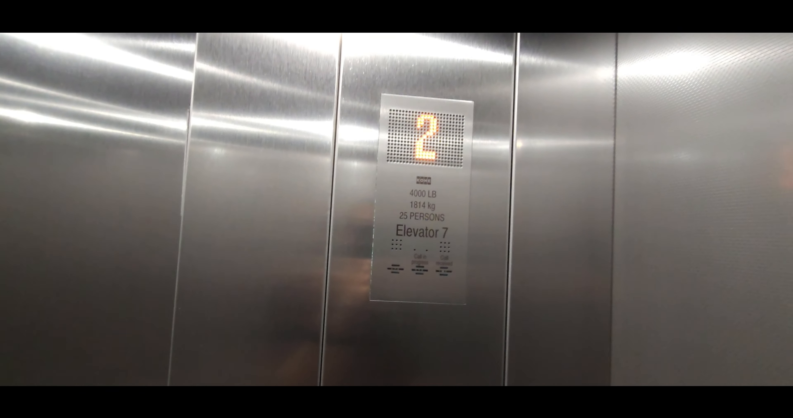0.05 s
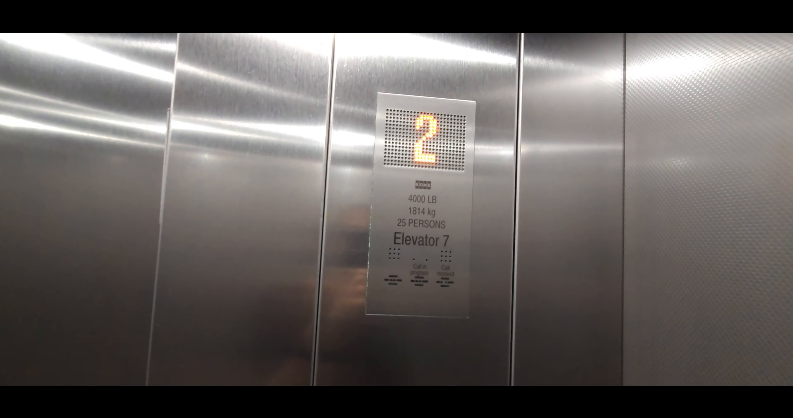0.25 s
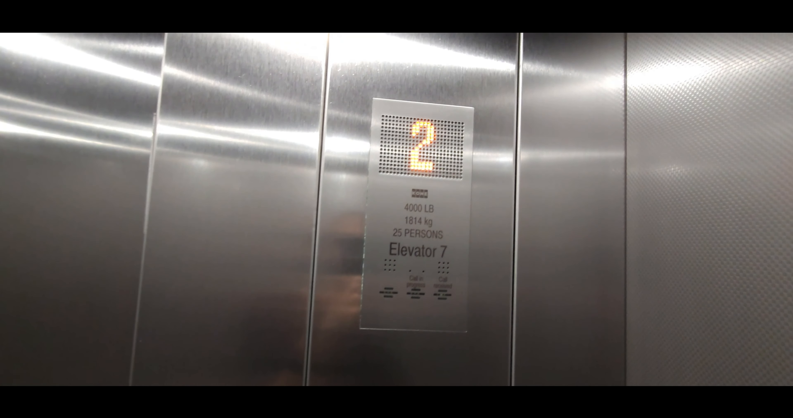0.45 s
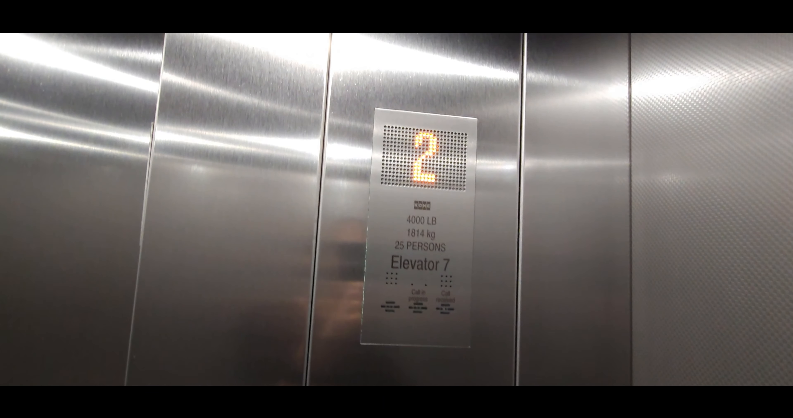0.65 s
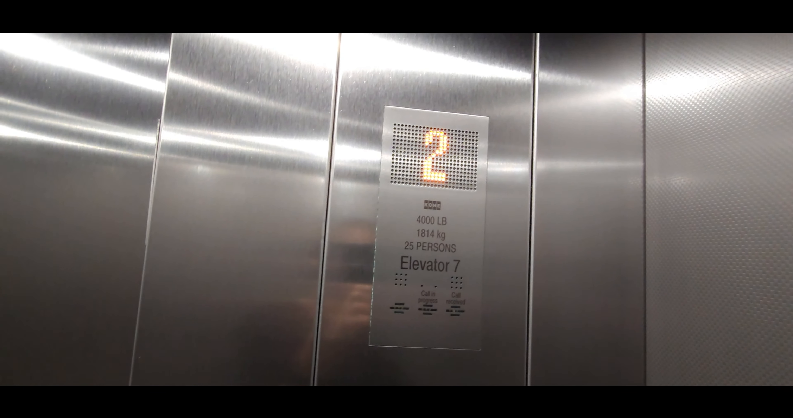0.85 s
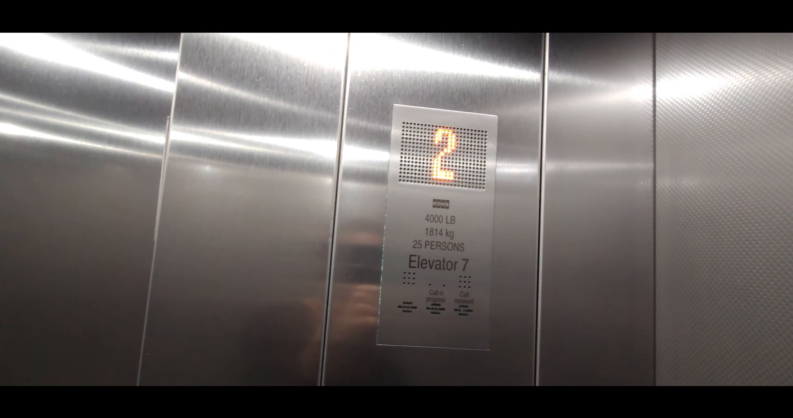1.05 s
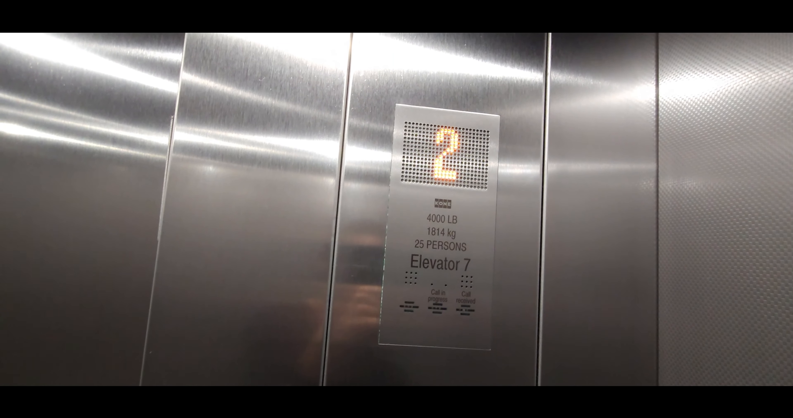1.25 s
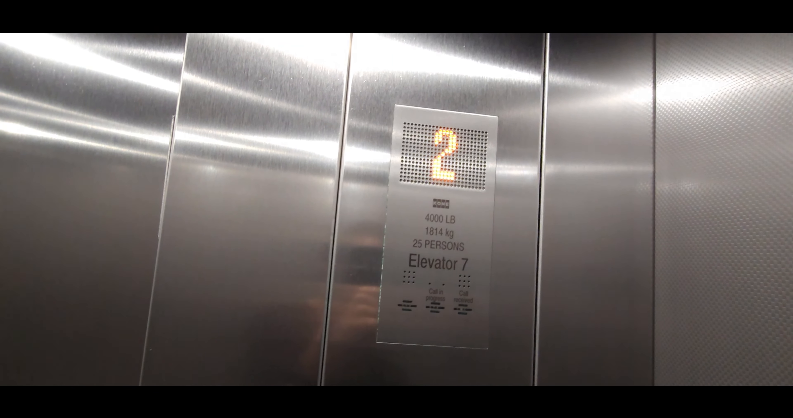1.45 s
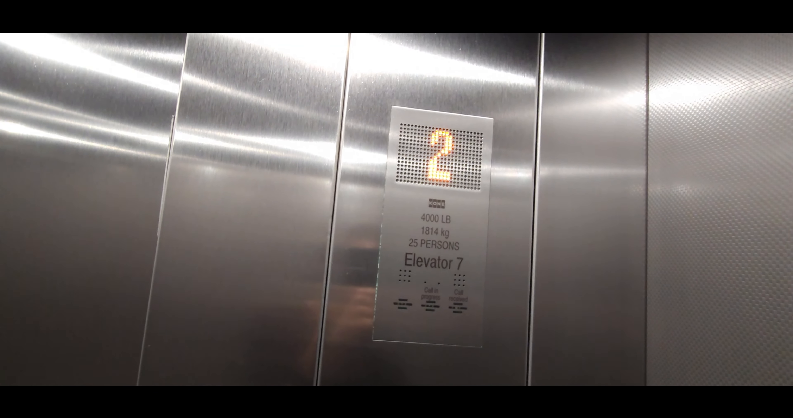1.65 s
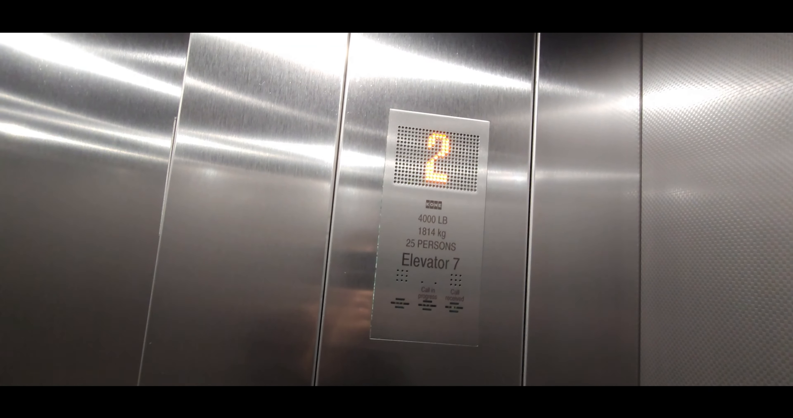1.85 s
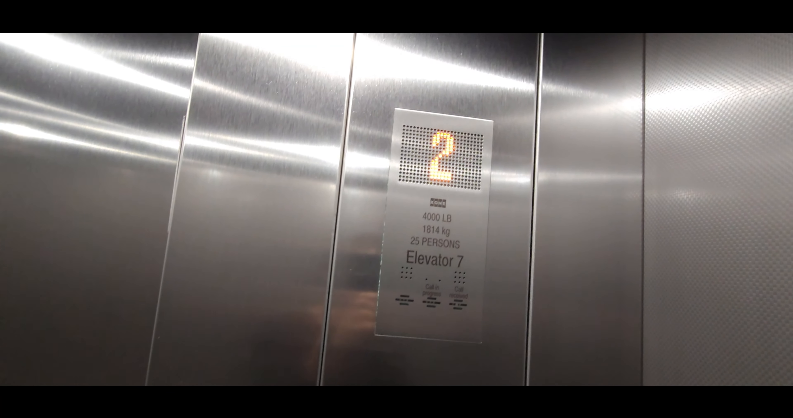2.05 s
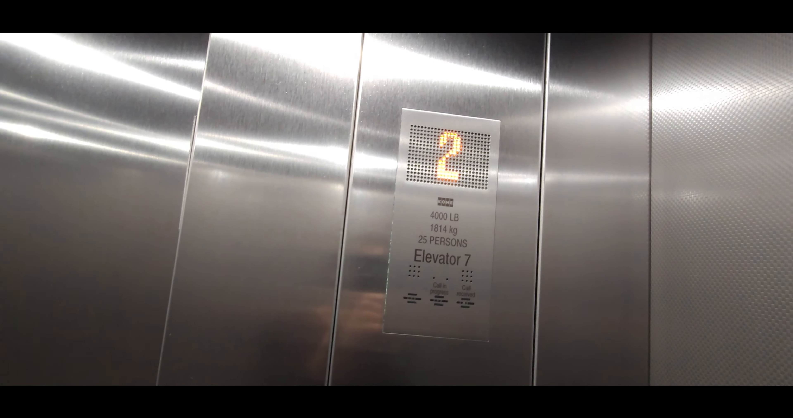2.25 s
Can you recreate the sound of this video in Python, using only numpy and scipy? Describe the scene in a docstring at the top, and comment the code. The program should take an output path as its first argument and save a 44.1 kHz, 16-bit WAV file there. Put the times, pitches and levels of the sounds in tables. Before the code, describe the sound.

An elevator ride from inside: deep hum and rumble swell while the steel car thumps and rattles

```python
"""Inside a steel hydraulic elevator car going up: tuned hum from the pump motor and noise rumble from the car,
both growing. A soft noise hiss stops early on, and dull thumps (pushes into a low resonance) recur throughout.
Then come panel knocks and small ticks (ringing noise bursts) and a brief scuff on the steel.
From about one second the car shudders in short swells of boom, rattle and buzz, with one sharp tick as they begin.
Near the end two snaps mark the loudest shudder overloading the microphone."""
import sys
import numpy as np
from scipy.fft import rfft, irfft, next_fast_len
from scipy.io import wavfile
from scipy.ndimage import uniform_filter1d, map_coordinates

SR = 44100
rng = np.random.default_rng(int(sys.argv[2]) if len(sys.argv) > 2 else 0)


def wav_record(signal):
    """Record a signal, one row per channel, as 16-bit PCM in the file named by sys.argv[1]."""
    frames = np.transpose(np.atleast_2d(signal))
    bounded = np.clip(frames, -1, 1)
    # unit amplitude maps onto the largest positive 16-bit level
    quanta = np.round(bounded * 32767).astype(np.int16)
    wavfile.write(sys.argv[1], SR, quanta)


N = 101562

# Every noise colour below has rows of: frequency in Hz, relative density in dB per Hz.

# Motor hum lines. Each row: frequency in Hz, level in dB before the hum fader.
HUM_LINES = [(121, -0.5), (253.7, 2), (505, -16.5), (560, -12.5), (673, -16), (762, -13), (1690, -44),
             (1976, -42)]
# Fader of the motor hum. Each row: time in seconds, gain in dB.
HUM_FADER = [(0, -51.5), (.8, -50.5), (1.15, -42.5), (1.65, -39), (1.95, -32), (2.3, -26.5)]
HUM_WAVER_DB, LOWEST_LINE_DRIFT_HZ = 2.5, 1.2

# Fader of the rumble and its air. Each row: time in seconds, gain in dB.
RIDE_FADER = [(0, -48.5), (0.468, -48), (0.821, -47), (1.102, -43.5), (1.3, -43), (1.63, -37.5),
              (1.95, -34.5), (2.3, -34.5)]
# Noise colour of the car's rumble.
RUMBLE_COLOUR = [(15, -13), (35, -0.5), (80, 3), (170, 1), (280, -8.5), (340, -13), (500, -9), (780, -14),
                 (950, -25), (1300, -44), (2500, -55), (4000, -64)]
# Resonances of the car and its walls. Each row: centre in Hz, width in Hz, lift in dB.
CAB_RESONANCES = [(124, 23, 4), (163, 18, -2.5), (247.4, 20, 11.5), (458.7, 41, 5.5), (507.3, 33, 8.5),
                  (557.4, 25, 6), (761, 100, 4), (1722, 150, 5), (1944, 56, 6.5)]
# Noise colour of the airy hiss of the ride.
AIR_COLOUR = [(1000, -18), (2500, 0), (3300, 2.5), (5500, 2), (6700, -3.5), (7300, -18), (12000, -28.5),
              (15500, -19)]
RUMBLE_DB, AIR_DB = 9, -22.5  # both before the ride fader

# Noise colour of the bright part of the early hiss.
BRIGHT_HISS_COLOUR = [(200, -11), (700, -23.5), (1200, 0.5), (2000, 2), (2700, -2.5), (3100, -2),
                      (3700, -6.5), (4100, -26.5), (6000, -30.5), (7000, -49)]
# Noise colour of the duller part, which lasts a little longer.
DULL_HISS_COLOUR = [(200, -12), (750, 3.5), (1300, -2.5), (1550, -21.5), (1800, -47.5)]
# Each part fades to silence at its end, over its release.
BRIGHT_DB, BRIGHT_SAG_DB_PER_S, BRIGHT_END_S, BRIGHT_RELEASE_S = -49.5, 11.5, 0.355, 0.0073
DULL_DB, DULL_END_S, DULL_RELEASE_S = -51, 0.44, 0.026

# Pushes behind the dull thumps. Each row: centre in seconds, push peak in dB, length in seconds.
THUMP_PUSHES = [(.036, -11, 0.0019), (.2135, 1, 0.0016), (0.286, -13, 0.0021), (1.084, -12, 0.0018),
                (1.335, -12, .0022), (1.729, -15, 0.0023), (1.78, 3, 0.0021), (2.021, 0, 0.0028),
                (2.203, -2, 0.0014)]
THUMP_HZ, THUMP_Q, THUMP_LOW_CUT_HZ = 58.4, 2.06, 26

# Panel knocks. Each row: start in seconds, level in dB, time to fall 60 dB in seconds.
PANEL_KNOCKS = [(.616, -30.5, 0.16), (.64, -21.5, 0.11), (.69, -29.5, 0.29), (.762, -27, 0.12),
                (1.426, -27.5, 0.073), (1.756, -21.5, 0.079), (1.857, -17.5, 0.17), (2.085, -30.5, .05),
                (2.152, -39.5, 0.091)]
# Noise colour of a knocked panel.
PANEL_COLOUR = [(150, -12), (350, -5.5), (470, 1), (620, 0.5), (800, -4.5), (1100, -21), (1600, -43),
                (2400, -48), (3200, -40.5), (4200, -63.5), (8000, -77)]
# Sharp metal ticks. Each row: start in seconds, level in dB, time to fall 60 dB in seconds.
METAL_TICKS = [(.618, -53, 0.14), (.957, -36, 0.14), (1.801, -43.5, 0.04)]
# Noise colour of the ticking metal.
METAL_COLOUR = [(1200, -49.5), (1800, -24), (2150, -9), (2500, -1), (3300, -1.5), (3900, -18.5),
                (6200, -25.5), (7200, -60)]
ATTACK_S = 0.0016

# Noise colour of the scuff.
SCUFF_COLOUR = [(150, -5), (400, -9), (750, -1), (1200, -4), (2000, -22), (2600, -30), (4000, -50)]
SCUFF_CENTRE_S, SCUFF_LENGTH_S, SCUFF_DB = 0.68, 0.06, -42.5

# Shudders. Each row: peak time in seconds, boom in dB, rattle in dB, rise in seconds, fall in seconds.
# Rise and fall are the times for 20 dB.
SHUDDER_SWELLS = [(.97, -29, -49, 0.093, 0.053), (1.343, -17, -30.5, 0.031, 0.075),
                  (1.437, -12, -28, 0.052, 0.058), (1.527, -20, -30.5, 0.025, 0.041),
                  (1.729, -14.5, -29, 0.028, 0.047), (1.787, -12, -20.5, 0.033, 0.041),
                  (1.846, -11.5, -28, 0.05, 0.049), (1.864, -16, -22.5, .025, .09),
                  (2.024, -4.5, -21, .045, 0.071), (2.201, -17.5, -26.5, 0.023, 0.055),
                  (2.295, -7, -22, 0.063, 0.18)]
# Noise colour of the boom.
BOOM_COLOUR = [(15, -30.5), (35, -14.5), (60, 2), (120, 1.5), (230, -5), (320, -18), (500, -36.5),
               (1000, -83)]
# Noise colour of the wall rattle.
RATTLE_COLOUR = [(150, -25.5), (300, -1), (450, 0), (750, -5.5), (1000, -18.5), (1400, -29), (2200, -41.5),
                 (4000, -64.5)]
# Noise colour of the buzz in the walls.
BUZZ_COLOUR = [(600, -22.5), (1200, 0.5), (2000, -2), (2700, -2), (3400, -3.5), (4200, -16.5),
               (6500, -17.5), (7500, -44), (15000, -48.5)]
BUZZ_DB = -19.5  # buzz under a full-scale rattle
BUZZ_GROWTH = 1.194  # dB of buzz for each dB of rattle

# Snaps of the overloaded microphone. Each row: centre in seconds, level in dB.
CRACKLE_SNAPS = [(2.0216, -30), (2.0321, -32.5)]
# Noise colour of a snap.
CRACKLE_COLOUR = [(300, -5), (900, 0), (2000, -6.5), (4000, -18.5), (8000, -31.5), (15000, -30)]
CRACKLE_LENGTH_S = 0.0013

CLIP_LEVEL, TOP_HZ = 1, 15760


def amp(db):
    """Decibels to gain."""
    return 10 ** (np.asarray(db) / 20)


def unit(x):
    """Scale to rms 1."""
    return x / np.sqrt(np.mean(x ** 2) + 1e-20)


def clock():
    """Time of each sample in seconds."""
    return np.arange(N) / SR


def fader(curve):
    """Gain that moves in straight dB lines between the points of a curve."""
    seconds, db = np.transpose(curve)
    return amp(np.interp(clock(), seconds, db))


def wobble(rate):
    """A smooth random curve, rate knots a second."""
    knots = rng.standard_normal(64 + N // 500)
    return map_coordinates(knots, [clock() * rate + 2], mode="wrap")


def filtered(x, response):
    """Filter x by a complex response of frequency."""
    m = next_fast_len(N + SR // 2)
    return irfft(rfft(x, m) * response(np.fft.rfftfreq(m, 1 / SR)), m)[:N]


def noise(colour, resonances=()):
    """Noise of rms 1 with a broad colour, lifted at the resonances."""
    f, db = np.transpose(colour)

    def response(hz):
        lift = sum(g / (1 + (2 * (hz - c) / w) ** 2) for c, w, g in resonances)
        return amp(np.interp(np.log(hz + 1), np.log(f), db) + lift)

    return unit(filtered(rng.standard_normal(N), response))


def steadied(x, window_s):
    """Noise with its slow chance swings evened out."""
    power = uniform_filter1d(x ** 2, max(int(window_s * SR), 8))
    return x / np.sqrt(np.abs(power) + 0.023)


def motor():
    """The pump motor hums in sine lines that waver a little in level and pitch."""
    lines = np.zeros(N)
    for hz, db in HUM_LINES:
        drift_hz = LOWEST_LINE_DRIFT_HZ * np.sqrt(hz / HUM_LINES[0][0])
        pitch = hz + drift_hz * wobble(14)
        phase = 2 * np.pi * (np.cumsum(pitch) / SR + rng.random())
        level = amp(db + HUM_WAVER_DB * wobble(8.985))
        lines += level * np.sqrt(2) * np.sin(phase)
    return lines


def rumble():
    """The moving car rumbles in its resonances, under a faint airy hiss."""
    body = amp(RUMBLE_DB + 1.2 * wobble(21)) * noise(RUMBLE_COLOUR, CAB_RESONANCES)
    return body + amp(AIR_DB) * noise(AIR_COLOUR)


def early_hiss():
    """Soft filtered noise whose bright part sags and stops first, the steady dull part soon after."""
    t = clock()

    def until(end, release):
        return np.clip((end - t) / release, 0, 1)

    bright_level = amp(BRIGHT_DB - BRIGHT_SAG_DB_PER_S * t) * until(BRIGHT_END_S, BRIGHT_RELEASE_S)
    dull_level = amp(DULL_DB) * until(DULL_END_S, DULL_RELEASE_S)
    return bright_level * noise(BRIGHT_HISS_COLOUR) + dull_level * noise(DULL_HISS_COLOUR)


def thumps():
    """Each soft push sets off a low, heavily damped swing that is gone in a few cycles."""
    t = clock()
    pushes = sum(amp(db) * np.exp(-((t - s) / length) ** 2) for s, db, length in THUMP_PUSHES)

    def response(hz):
        swing = -hz ** 2 / (THUMP_HZ ** 2 - hz ** 2 + 1j * hz * THUMP_HZ / THUMP_Q)
        low_cut = 1j * hz / (THUMP_LOW_CUT_HZ + 1j * hz)
        return swing * low_cut

    return filtered(pushes, response)


def hits(rows, colour, resonances=()):
    """Blows on steel: a quick attack, then a dense noise ring that dies away."""
    level = np.zeros(N)
    for start, db, t60 in rows:
        age = np.maximum(clock() - start, 0)
        attack = np.minimum(age / ATTACK_S, 1)
        level += amp(db - 60 * age / t60) * attack
    return level * steadied(noise(colour, resonances), window_s=0.0086)


def knocks():
    """Struck panels ring through the resonances of the car."""
    return hits(PANEL_KNOCKS, PANEL_COLOUR, CAB_RESONANCES)


def ticks():
    """Small metal blows ring bright, without the car's resonances."""
    return hits(METAL_TICKS, METAL_COLOUR)


def scuff():
    """A short, rough rub on the steel, as noise with a fast uneven level."""
    stroke = np.exp(-np.abs(2 * (clock() - SCUFF_CENTRE_S) / SCUFF_LENGTH_S) ** 4)
    return stroke * amp(SCUFF_DB + 1.8 * wobble(119.85)) * noise(SCUFF_COLOUR, CAB_RESONANCES)


def shudders():
    """Swells of boom and wall rattle, with a buzz that grows faster than the rattle."""
    t, boom_level, rattle_level = clock(), np.zeros(N), np.zeros(N)
    for peak, boom_db, rattle_db, rise, fall in SHUDDER_SWELLS:
        shape_db = -20 * np.maximum((peak - t) / rise, (t - peak) / fall)
        boom_level += amp(boom_db + shape_db)
        rattle_level += amp(rattle_db + shape_db)
    boom = boom_level * steadied(noise(BOOM_COLOUR, CAB_RESONANCES), window_s=0.039)
    rattle = rattle_level * noise(RATTLE_COLOUR, CAB_RESONANCES)
    buzz = amp(BUZZ_DB) * rattle_level ** BUZZ_GROWTH * noise(BUZZ_COLOUR, CAB_RESONANCES)
    return boom + amp(1.8 * wobble(90)) * (rattle + buzz)


def crackles():
    """Microphone overload, drawn as very short bursts of wide-band noise at set times."""
    t = clock()
    level = sum(amp(db) * np.exp(-((t - s) / CRACKLE_LENGTH_S) ** 2) for s, db in CRACKLE_SNAPS)
    return level * noise(CRACKLE_COLOUR)


def scene():
    """Hum and rumble grow on their own faders; the short sounds lie on top."""
    ride = fader(HUM_FADER) * motor() + fader(RIDE_FADER) * rumble()
    short_sounds = early_hiss() + thumps() + knocks() + ticks() + scuff() + shudders() + crackles()
    return (ride + short_sounds)[None]


def record(dry):
    """The microphone rounds off the highest peaks and keeps nothing above its band limit."""
    rounded = dry[0] / (1 + np.abs(dry[0] / CLIP_LEVEL) ** 8) ** (1 / 8)
    return filtered(rounded, lambda hz: hz < TOP_HZ)[None]


dry = scene()
out = record(dry)
wav_record(out)
```